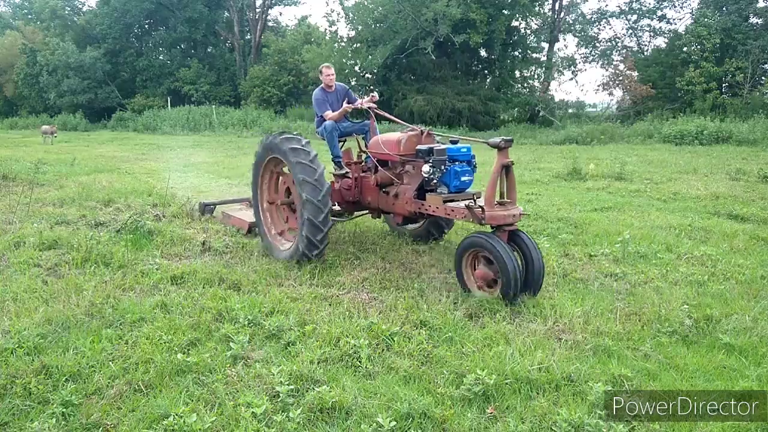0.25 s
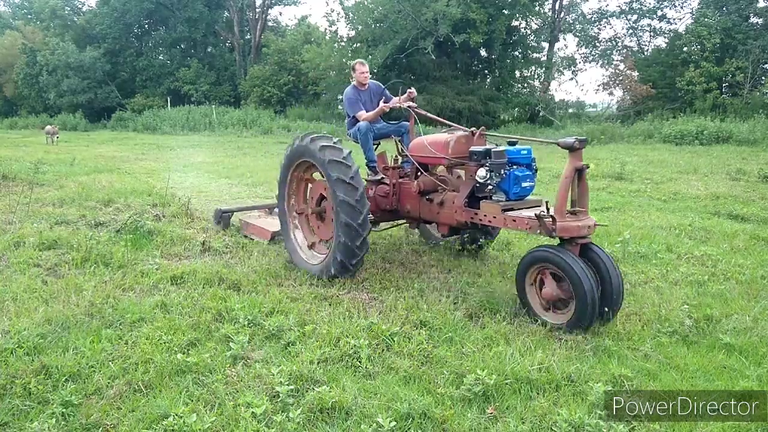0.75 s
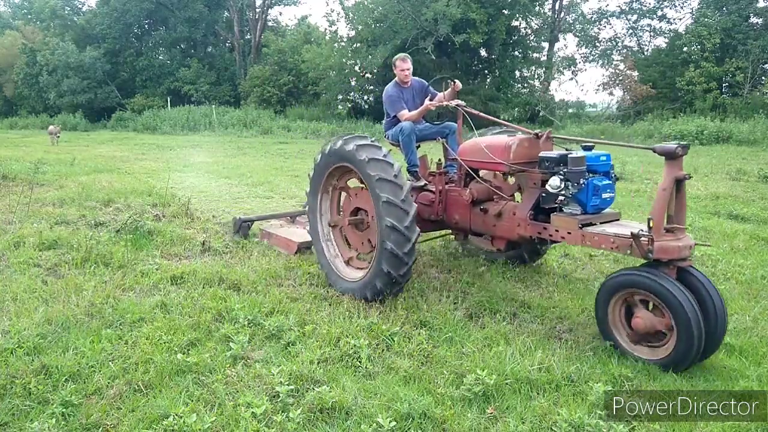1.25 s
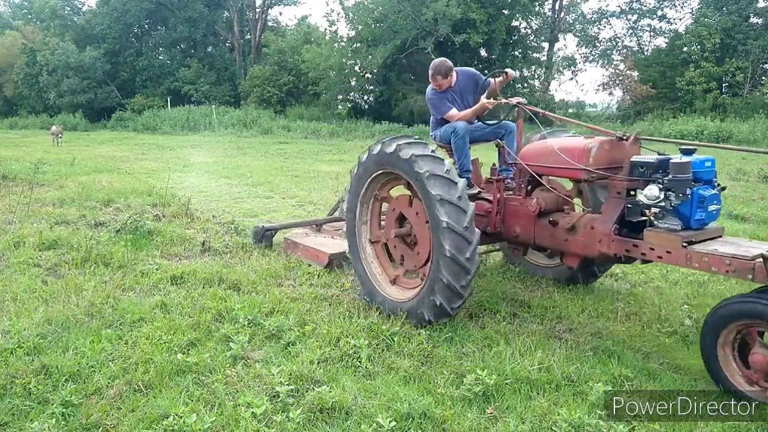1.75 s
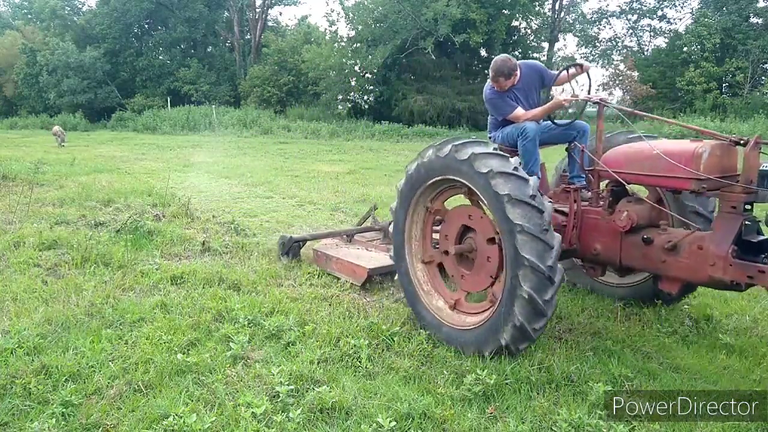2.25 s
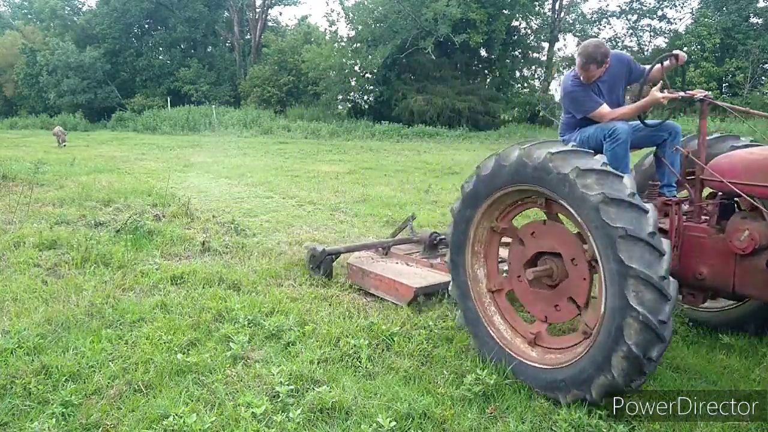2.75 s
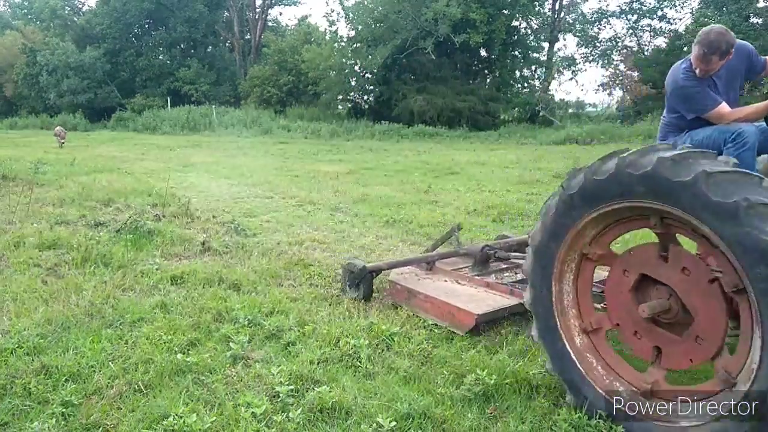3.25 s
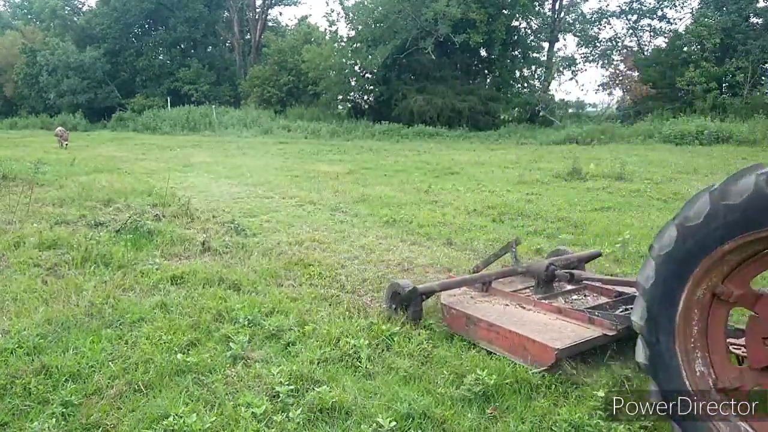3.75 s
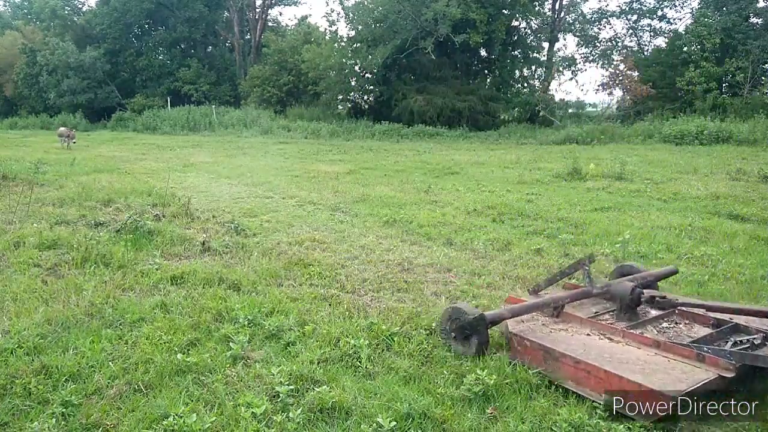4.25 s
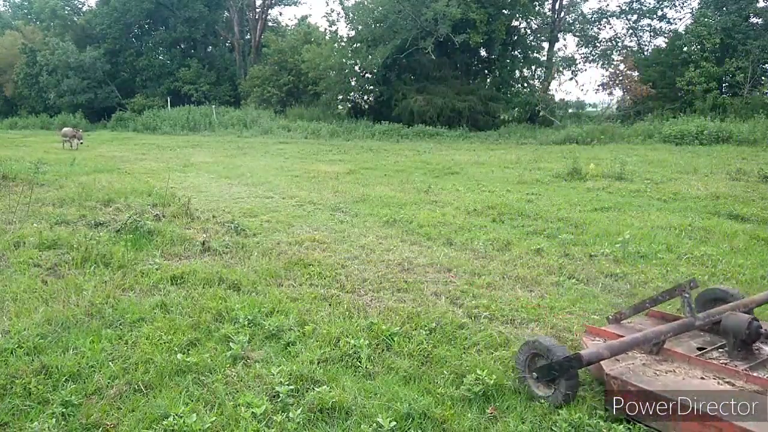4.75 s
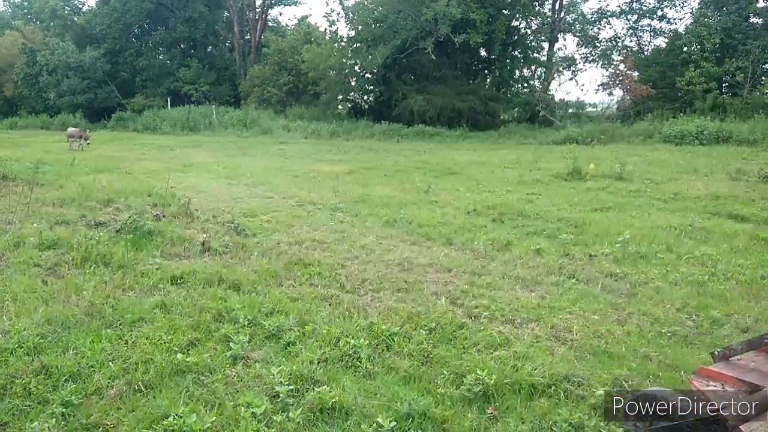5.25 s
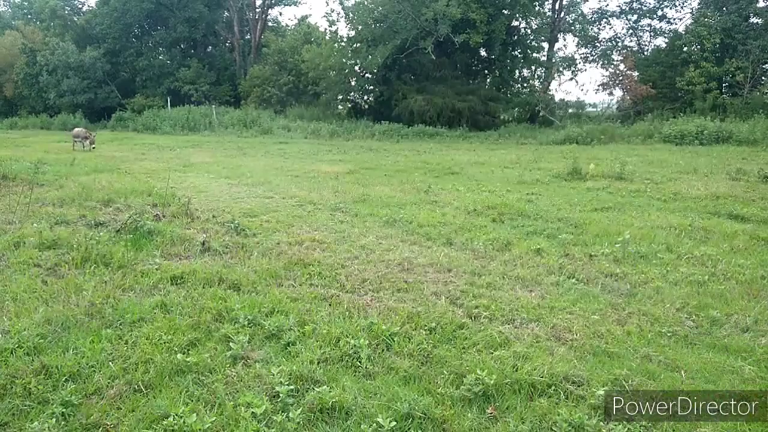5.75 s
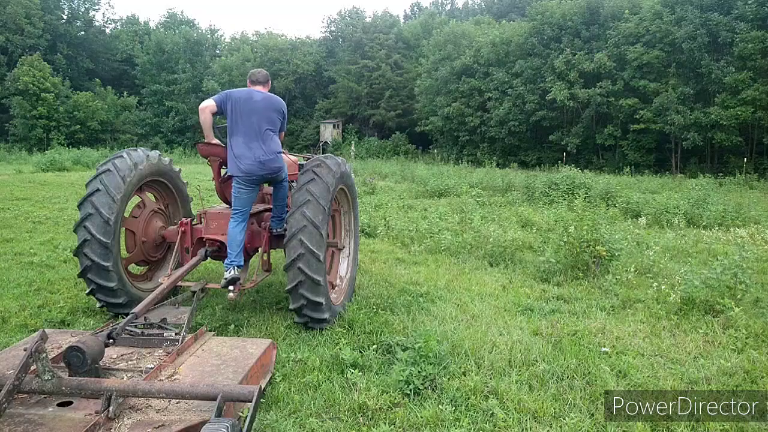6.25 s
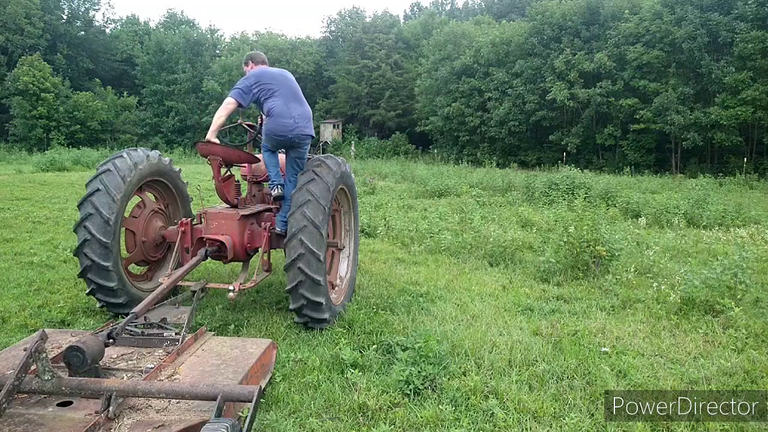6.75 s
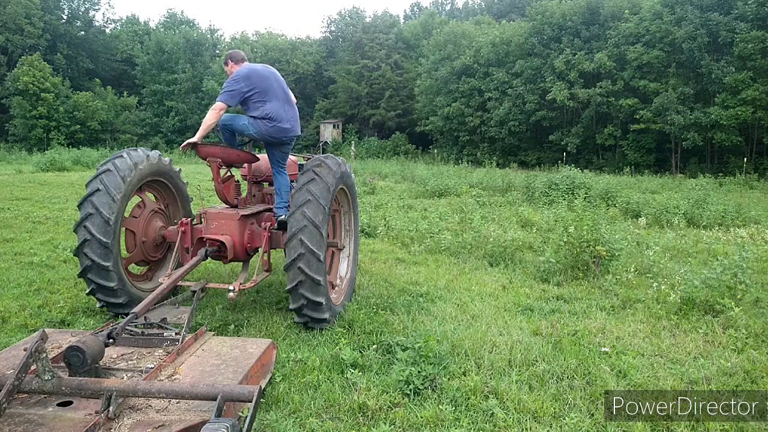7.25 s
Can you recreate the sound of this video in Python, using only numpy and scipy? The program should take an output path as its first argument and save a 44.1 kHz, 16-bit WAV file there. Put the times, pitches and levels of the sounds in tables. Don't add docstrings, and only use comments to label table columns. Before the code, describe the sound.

From 0 s a small single-cylinder gasoline engine runs loaded on a tractor towing a mower, heard close in an open field. It fires about 42 times a second, a dense, buzzing putter with a hollow exhaust note, crankcase knocking, fan whine, belt and gear rattle, and bright mechanical hiss over low roar. It is fullest from about 1.7 to 3.5 s as the tractor passes, the exhaust colour shifting and the sound leaning to the right. Short stumbles make the pitch sag and recover, notably around 0.9, 1.3, 2.2 and 3.3 s. A tiny gap comes at 4.23 s, then the level fades steadily until 6.22 s. One engine pop stutters at 6.25 s. From 6.27 s, much quieter, the engine idles at about 14 soft puffs per second with ringing sheet metal, airy noise and insects. A boot touches faintly at 6.6, scuffs at 7.08, and clinks steel at 7.16, 7.19 and 7.48 s.

```python
import sys
import numpy as np
from scipy import signal
from scipy.io import wavfile
from scipy.ndimage import uniform_filter1d, map_coordinates

SR = 44100
rng = np.random.default_rng(int(sys.argv[2]) if len(sys.argv) > 2 else 0)


def attenuation_scalar(level_db):
    decades = np.asarray(level_db, float) / 20
    return 10 ** decades


def output_pcm(signal):
    pcm = np.clip(np.atleast_2d(signal).T, -1, 1) * 32767
    wavfile.write(sys.argv[1], SR, np.round(pcm).astype(np.int16))


N = 330750

# (nose [dB], engine side [dB], rear wheel [dB], mower deck [dB], tail [dB])
SHADOW = [
    (0, .7, 1.5, 0, .5),
    (-.5, -.5, -1, 0, 0),
    (-.5, -2.5, -3, -4.5, -5),
    (-4.5, -6, -6.5, -9, -10.5),
]

IDLE_FIRST_S, IDLE_PERIOD_S = 6.2445, .071


def rms_one(x):
    return x / np.sqrt(np.mean(x ** 2) + 1e-20)


def in_time(rows):
    s, *columns = np.transpose(rows)
    return np.array([np.interp(np.arange(N) / SR, s, c) for c in columns])


def by_side(rows, stumble_db=0, hollow=0):
    sides_s = [0, 2.0, 3.4, 4.5, 5.1]
    levels = np.array([np.interp(np.arange(N) / SR, sides_s, row) for row in rows])
    return levels + np.reshape(stumble_db, (-1, 1)) * hollow


def at_hz(points, hz):
    points = np.array(points)
    return np.interp(np.log(hz), np.log(points[:, 0]), points[:, 1])


def drift(rate):
    step = 40
    r = np.exp(-2 * step * np.pi * rate / SR)
    slow = signal.lfilter([1], [1, -2 * r, r * r], rng.standard_normal(N // step + 2002))[2000:]
    return np.interp(np.arange(N) / step, np.arange(len(slow)), rms_one(slow))


def resonance(x, hz, width_hz):
    r = np.exp(-np.pi * width_hz / SR)
    zeros = np.array([1, 0, -1]) * (1 - r * r) / 2
    poles = [1, -2 * r * np.cos(2 * np.pi * hz / SR), r * r]
    return signal.lfilter(zeros, poles, x + 1e-18)


def double_resonance(x, hz, width_hz, second_width_hz):
    return resonance(resonance(x, hz, width_hz), hz, second_width_hz)


def late(x, ms):
    return np.interp(np.arange(N) - ms * SR / 1000, np.arange(N), x)


def ports(x, lag_ms, pan_db):
    return np.array([late(x, lag_ms) * attenuation_scalar(pan_db / 2), late(x, 0 * lag_ms) * attenuation_scalar(-pan_db / 2)])


def noise_bands(spectrum, low_hz, lag_ms, level_db, pan_db, patchy_db, spread=0):
    # (frequency [Hz], coherence [0-1])
    likeness = [(25, .75), (100, .95), (600, .9), (1300, .8), (2000, .97), (3300, .97), (4300, .5),
                (5400, .94), (6300, .92), (7500, .45), (12000, .4)]
    out, together = 0, drift(4.6)
    top_hz = spectrum[-1][0]
    edges = np.geomspace(low_hz, top_hz, int(3 * np.log2(top_hz / low_hz)) + 1)
    common, left, right = rng.standard_normal((3, 2, N))
    when = np.arange(N) - lag_ms * SR / 1000
    trailing = [rms_one(map_coordinates(c, [when], order=3)) for c in common]
    for k, (low, high) in enumerate(zip(edges, edges[1:])):
        hz = np.sqrt(low * high)
        lost = np.minimum(spread * (hz / 3300) ** 2, .3)
        alike = np.clip(at_hz(likeness, hz) * (1 - lost), 0, 1)
        shared = np.array([trailing[k % 2], common[k % 2]])
        separate = np.array([left[k % 2], right[k % 2]])
        pair = np.sqrt(alike) * shared + np.sqrt(1 - alike) * separate
        band = signal.sosfilt(signal.butter(2, [low, high], "band", fs=SR, output="sos"), pair)
        gain_db = at_hz(spectrum, hz) + level_db(hz) + patchy_db * (0.87 * together + drift(21.0))
        out = out + band * attenuation_scalar(gain_db + pan_db(hz) * np.array([[.5], [-.5]]))
    return out


def firings(turns, uneven_db):
    strength = attenuation_scalar(uneven_db * rng.standard_normal(400))[np.round(turns).astype(int)]
    return strength * np.exp(-((turns - np.round(turns)) / .004) ** 2)


def exhaust(turns, puff_db, hollow):
    # (time [s], four shares of the puff [ratio])
    early_returns = [(0.0, 1.07, 1.2, 1.19, 1.4), (0.4, 1.55, 1.44, 1.59, 1.8),
                     (0.8, 1.19, 0.89, 1.33, 0.88), (1.1, 0.96, 1.33, 1.31, -0.16),
                     (1.4, 0.88, 0.84, 1.25, -0.11), (1.7, 0.45, 0.7, 1.04, -0.3),
                     (2.0, -0.04, 0.57, 0.8, -0.44), (2.2, -0.08, 0.56, 0.27, -0.32),
                     (2.4, 0.05, 0.98, -0.79, -0.27), (2.6, -0.1, 0.88, -0.32, -0.62),
                     (2.85, -0.45, 0.65, 0.36, -0.86), (3.1, -0.45, 0.36, 0.44, -0.33),
                     (3.35, -0.51, 0.49, 0.07, -0.13), (3.55, -0.5, 0.84, -0.87, -0.12),
                     (3.75, 0.05, 0.43, -1.25, 0.33), (4.0, -0.26, 0.74, -0.73, -0.27),
                     (4.2, -0.48, 0.7, 0.96, -0.65), (4.45, -0.32, 0.52, 0.55, -0.54),
                     (4.65, -0.11, 0.81, -0.0, -0.47), (4.85, 0.41, 0.52, -0.74, -0.32),
                     (5.1, 0.85, 0.86, -0.76, 0.1), (5.4, 0.87, 0.95, -0.15, -0.3),
                     (5.7, 0.86, 1.01, 0.21, -0.62), (6.2, 0.79, 0.81, -0.29, 0.14)]
    # (time [s], four shares of the puff [ratio])
    late_returns = [(0.0, 0.81, 0.52, -0.31, 0.36), (0.4, 0.96, 0.36, -0.63, 0.11),
                    (0.8, 0.45, 0.27, -0.29, 0.02), (1.1, -0.03, -0.24, 0.11, -0.3),
                    (1.4, 0.09, -0.14, -0.05, -0.39), (1.7, -0.35, -0.22, 0.03, -0.38),
                    (2.0, -0.36, -0.32, -0.08, -0.25), (2.2, -0.07, -0.23, 0.07, -0.29),
                    (2.4, 0.24, 0.12, 0.09, 0.34), (2.6, -0.26, -0.24, 0.34, 0.07),
                    (2.85, -0.95, -0.8, -0.15, -0.23), (3.1, 0.08, -0.08, -0.07, -0.27),
                    (3.35, 0.13, -0.12, 0.14, -0.3), (3.55, 0.48, 0.36, 0.32, 0.06),
                    (3.75, 1.22, 1.2, 0.52, 0.41), (4.0, -0.0, 0.11, 0.2, 0.24),
                    (4.2, -0.7, -0.77, 0.12, -0.6), (4.45, -0.38, -0.52, 0.1, -0.13),
                    (4.65, -0.1, -0.4, 0.16, -0.19), (4.85, 0.56, -0.11, 0.07, 0.39),
                    (5.1, 0.89, 0.49, 0.17, 0.49), (5.4, 0.46, 0.05, 0.04, 0.09),
                    (5.7, 0.02, -0.28, -0.16, 0.16), (6.2, 0.77, 0.56, 0.13, 0.28)]
    return_ms = (2.42, 4.51, 6.79, 9.02, 10.49, 11.81, 13.56, 17.27)
    # (time [s], level [dB])
    chamber_level = [(0, -29), (.75, -37), (1.0, -41), (1.6, -56), (2.1, -50), (2.5, -36), (3.3, -31),
                     (3.55, -39.5), (3.9, -32.5), (4.3, -42), (4.6, -68), (6.2, -57)]
    # (time [s], hidden share [0-1])
    shielded = [(0, 0), (3.3, 0), (3.6, .3), (4.5, .3), (4.8, .85), (6.2, .85)]
    outlet_hz, outlet_width_hz = 319.6, 177.8
    chamber_hz, chamber_width_hz = 561.3, 24
    returns_lost = .42

    puffs = rms_one(firings(turns, uneven_db=.9))
    turbulence = .2 * rng.standard_normal(N) * (1 + .5 * np.cos(2 * np.pi * turns))
    puffs = puffs + turbulence
    pop = double_resonance(puffs, outlet_hz, outlet_width_hz, outlet_width_hz)
    pop = signal.sosfilt(signal.butter(4, 188, "high", fs=SR, output="sos"), pop)

    kept = 1 - returns_lost * np.minimum(hollow, 1)
    pipe = pop
    for share, ms in zip([*in_time(early_returns), *in_time(late_returns)], return_ms):
        far = kept if ms > return_ms[1] else 1
        pipe = pipe + share * far * late(pop, ms)
    hidden = in_time(shielded)[0]
    pipe = (1 - hidden) * pipe + hidden * attenuation_scalar(1.5) * resonance(pipe, 355, 236)
    chamber = rms_one(double_resonance(puffs, chamber_hz, chamber_width_hz, 11.0 * chamber_width_hz))
    return attenuation_scalar(puff_db) * pipe + attenuation_scalar(in_time(chamber_level)[0]) * chamber


def low_orders(turns, hollow):
    # (nose [dB], engine side [dB], rear wheel [dB], mower deck [dB], tail [dB])
    orders = [
        (-35.5, -36, -43.5, -41.5, -40),
        (-50, -52, -52, -44.5, -42.5),
        (-40.5, -56.5, -48, -48, -40.5),
        (-53, -39, -44, -47, -48.5),
        (-61, -63, -67, -66, -67),
        (-69, -73.5, -55, -55, -56.5),
    ]
    stumble_change = [-3.5, 18, 2, -5, 8, -3]
    second_db, third_db, fourth_db, whine_db, first_db, fifth_db = by_side(orders, stumble_change, hollow)
    tones = [(1, first_db), (5, fifth_db), (2, second_db), (3, third_db - 3.5), (4, fourth_db),
             (36, whine_db + 2.5 * drift(8.0))]
    return sum(np.sqrt(2) * attenuation_scalar(db) * np.sin(2 * np.pi * order * turns) for order, db in tones)


def casing(turns, away):
    # (frequency [Hz], width [Hz])
    modes = [(700, 100), (865, 285), (975, 24), (1160, 64)]
    # (nose [dB], engine side [dB], rear wheel [dB], mower deck [dB], tail [dB])
    panel_levels = [(-48, -41, -34, -35, -37), (-27, -28.5, -33, -32, -30.5), (-42.5, -62, -33.5, -47, -47),
                    (-39, -40, -39, -38, -35.5)]
    knocks = rms_one(firings(turns + 0.054, uneven_db=-2.5))
    swell = np.exp(.6 * np.cos(2 * np.pi * (turns + .05)))
    knocks = knocks + (1.5 + 1.8 * away) * rng.standard_normal(N) * swell
    panels = [double_resonance(knocks, hz, width, 0.91 * width) for hz, width in modes]
    panels = [p / np.sqrt(uniform_filter1d(p ** 2, size=SR // 2) + 1e-12) for p in panels]
    return np.sum(panels * attenuation_scalar(by_side(panel_levels) - 5.5), axis=0)


def machinery(turns, lag_ms, controls):
    # (frequency [Hz], level [dB per Hz])
    hiss = [(740, -33), (1250, -6), (1510, -7.5), (1750, -13), (1990, 1.5), (2170, -26.5), (2710, -5.5),
            (3600, -1), (5930, -7.5), (9050, -5.5), (12300, -12.5), (14900, -13.5), (15700, -14)]
    # (frequency [Hz], row [index])
    control_rows = [(1500, 0), (2200, 1), (4000, 2), (9000, 3)]
    # (frequency [Hz], row [index])
    shadow_rows = [(1000, 0), (3000, 1), (5500, 2), (8000, 3)]
    # (time [s], likeness lost at 3.3 kHz [0-1])
    deck_spread = [(0, 0), (2.2, 0), (2.8, .15), (4.7, .12), (5.2, 0), (6.2, .01)]
    shadow = by_side(SHADOW)
    controls = controls - controls[:, :5 * SR].mean(axis=1, keepdims=True)
    angle = 2 * np.pi * (turns + .13)
    pulse_db = 1.4 * np.cos(angle) + .9 * np.cos(2 * angle)

    def blend(curves, place):
        return sum(c * max(0, 1 - abs(place - k)) for k, c in enumerate(curves))

    def level_db(hz):
        return blend(controls, at_hz(control_rows, hz)) + pulse_db

    def pan_db(hz):
        return blend(shadow, at_hz(shadow_rows, hz))

    return attenuation_scalar(-16.5) * noise_bands(hiss, 1126.3, lag_ms, level_db, pan_db, patchy_db=0.79,
                                    spread=in_time(deck_spread)[0])


def roar(lag_ms):
    # (frequency [Hz], level [dB per Hz])
    spectrum = [(25, -18), (60, -13), (120, -7), (220, -7), (400, 0), (520, -4), (700, -9), (1000, -7),
                (1300, -9)]
    # (nose [dB], engine side [dB], rear wheel [dB], mower deck [dB], tail [dB])
    roar_level = [(-41, -38, -37.5, -38, -42)]
    noise = noise_bands(spectrum, spectrum[0][0], lag_ms, lambda hz: 0, lambda hz: 0, patchy_db=1.6)
    return attenuation_scalar(by_side(roar_level)[0]) * rms_one(noise)


def gearbox(rattle_db):
    # (frequency [Hz], width [Hz], level over the rattle [dB])
    gears = [(1989, 124, -3.5), (2393, 400, -4.5)]
    tones = 0
    for hz, width, db in gears:
        ring = rms_one(double_resonance(rng.standard_normal(N), hz, width, width))
        tones = tones + attenuation_scalar(db + 3.4 * drift(13.0)) * ring
    coming_into_view = np.clip(np.arange(N) / SR / 2.8, 0, 1)
    return tones * attenuation_scalar(uniform_filter1d(rattle_db, size=SR // 2)) * coming_into_view


def stumbling():
    # (start [s], length [s], speed lost [firings per s], hollowness [0-1])
    stumbles = [(.69, .05, .4, 0), (.88, .16, 3.21, 1), (1.25, .12, 3.1, 1), (1.48, .08, 1.36, 0),
                (1.74, .05, .97, 0), (2.17, .11, 1.99, .9), (2.48, .16, 2.16, .1), (2.74, .08, 1.37, 0),
                (2.93, .08, 1.37, 0), (3.12, .09, 1.52, 0), (3.33, .16, 2.81, .6), (3.68, .11, .89, .35),
                (3.95, .09, 1.73, .6), (4.16, .07, 1.38, 0), (4.42, .04, .87, 0), (4.64, .09, 1.94, .35),
                (5.31, .05, 1.1, .3), (5.52, .09, .67, 0)]
    recover_s, edge_s = .1, .03
    t, sag, hollow = np.arange(N) / SR, 0, 0
    for start, length, lost, depth in stumbles:
        falling = np.clip((t - start) / length, 0, 1)
        sag = sag + lost * falling * np.exp(-np.maximum(t - start - length, 0) / recover_s)
        inside = np.minimum(t - start, start + length + edge_s - t)
        hollow = hollow + depth * np.clip(inside / edge_s, 0, 1)
    return sag, hollow


def passing():
    # (time [s], rate [firings per s])
    speed = [(0.0, 41.46), (0.85, 42.63), (1.25, 43.61), (1.6, 42.61), (2.1, 42.76), (2.75, 42.35),
             (3.3, 43.72), (3.9, 41.97), (4.6, 42.85), (5.2, 41.7), (6.2, 41.38)]
    # (time [s], lag [ms])
    lag = [(0, 0.0012), (.4, 0.04), (.75, .082), (1.15, .088), (1.42, .118), (1.5, .178), (1.65, .19),
           (1.95, .22), (2.25, .252), (3.0, .345), (4.0, 0.435), (4.7, 0.472), (5.3, .485), (6.2, 0.455)]
    # (time [s], level [dB])
    puff_level = [(0.0, -17.5), (0.4, -18.5), (0.8, -15), (1.1, -15.5), (1.4, -14), (1.7, -12.5),
                  (2.0, -11), (2.2, -11), (2.4, -12.5), (2.6, -12.5), (2.85, -13), (3.1, -11), (3.35, -12),
                  (3.55, -12.5), (3.75, -15), (4.0, -12), (4.2, -14.5), (4.45, -11.5), (4.65, -12.5),
                  (4.85, -15.5), (5.1, -18.5), (5.4, -17), (5.7, -18.5), (6.2, -15.5)]
    # (nose [dB], engine side [dB], rear wheel [dB], mower deck [dB], tail [dB])
    clatter = [
        (-37.5, -32.5, -37, -41.5, -40),
        (-38.5, -39, -38, -39.5, -38.5),
        (-33.5, -31.5, -32.5, -31, -32.5),
        (-31, -28, -27.5, -29, -28),
    ]
    clatter_stumble = [-1.4, -2.5, -1.1, -1.3]
    sag, hollow = stumbling()
    turns = np.cumsum(in_time(speed)[0] - sag) / SR - .004
    lag_ms, low_pan = in_time(lag)[0], by_side(SHADOW)[0]
    away = lag_ms / lag_ms.max()
    clatter_db = by_side(clatter, clatter_stumble, hollow)

    voiced = exhaust(turns, in_time(puff_level)[0], hollow) + low_orders(turns, hollow)
    voiced = voiced + gearbox(clatter_db[1])
    block = ports(casing(turns, away), .8 * lag_ms, low_pan)
    wander_ms = .008 * (.2 + .8 * away) * drift(3)
    noise = machinery(turns, lag_ms + wander_ms, clatter_db)
    return ports(voiced, lag_ms, low_pan) + block + noise + roar(lag_ms)


def idle_exhaust():
    # (frequency [Hz], width [Hz], level [dB])
    pipe_modes = [(63.4, 30, -13.5), (108, 22.6, -2), (155, 97, 1.5), (209, 99, -33.5)]
    jitter_s, puff_db, uneven_db = 0.0023, -31, 1
    puffs = np.zeros(N)
    chance = rng.standard_normal((18, 2))
    fired_s = IDLE_FIRST_S + IDLE_PERIOD_S * np.arange(len(chance)) + jitter_s * chance[:, 0]
    puffs[((fired_s + .003) * SR).astype(int)] = -attenuation_scalar(puff_db + uneven_db * chance[:, 1])
    puffs = uniform_filter1d(puffs, size=SR // 300) * 1.57
    puffs = puffs + 0.42 * late(puffs, 17.0)
    pipe = 0
    for k, (hz, width, db) in enumerate(pipe_modes):
        pipe = pipe + (-1) ** k * attenuation_scalar(db) * double_resonance(puffs, hz, width, 4.1 * width) / width
    return attenuation_scalar(77.5) * pipe


def sheet_metal():
    # (frequency [Hz], width [Hz], level [dB])
    modes = [(898, 19, -52.5), (803, 74, -57), (386, 110, -60.5), (1088, 63, -62), (2297, 90, -66),
             (2013, 46, -68.5), (4230, 33, -89), (6300, 90, -81.5), (8200, 150, -83)]
    return sum(attenuation_scalar(db) * rms_one(double_resonance(rng.standard_normal(N), hz, width, width))
               for hz, width, db in modes)


def open_air(lag_ms):
    # (frequency [Hz], level [dB per Hz])
    spectrum = [(140, -46), (240, -5.5), (311, -25), (608, -4), (720, -34), (893, -5), (956, -14),
                (1160, -11), (1650, -17), (2900, -23), (3600, -47), (4680, -75.5), (7920, -120)]
    air = rms_one(noise_bands(spectrum, 220, lag_ms, lambda hz: 0, lambda hz: .5, patchy_db=.5))
    throb_db = -0.5 * np.sin(np.pi * (np.arange(N) / SR - IDLE_FIRST_S) / IDLE_PERIOD_S)
    return attenuation_scalar(-52.5 + throb_db) * air


def field(lag_ms):
    # (frequency [Hz], level [dB per Hz])
    spectrum = [(3300, 2), (4000, 0), (5000, -2.5), (6300, -3), (8000, -5), (10000, -7.5), (13000, -10),
                (15800, -14)]
    noise = noise_bands(spectrum, 3300, 9 + lag_ms, lambda hz: 0, lambda hz: -2.5, patchy_db=.4)
    return attenuation_scalar(-68.5) * rms_one(noise)


def boot_taps():
    # (time [s], peak level [dB], frequency [Hz])
    clinks = [
        (6.6059, -67, 2780),
        (7.158, -47, 2820),
        (7.1935, -48, 2890),
        (7.4769, -53.5, 2730),
    ]
    taps = np.zeros(N)
    for s, db, hz in clinks:
        tap = np.zeros(N)
        tap[round(s * SR)] = attenuation_scalar(db + 42.5)
        taps += double_resonance(tap, hz, 63.0, 410.0)
        taps += 0.82 * resonance(resonance(tap, 2.1 * hz, 90.0), 2.17 * hz, 375.0)
    return taps


def boot_scuff():
    middle_s, length_s, level_db = 7.08, .05, -59
    envelope = np.exp(-((np.arange(N) / SR - middle_s) / length_s) ** 2)
    rub = resonance(resonance(rng.standard_normal(N), 1400, 2000), 1300, 2230)
    return attenuation_scalar(level_db) * envelope * rms_one(rub)


def idling():
    lag_ms = np.full(N, -.1)
    compact = idle_exhaust() + sheet_metal() + boot_taps() + boot_scuff()
    return ports(compact, lag_ms, -0.47) + open_air(lag_ms) + field(lag_ms)


def scene():
    dropout_s, dropout_end_s = 4.225, 4.2397
    fade_end_s, silent_s = 6.2255, 6.254
    stutter_s, idle_s, stutter_from_s = 6.2497, 6.2705, 5.2
    stutter_db, stutter_edge_s = 6.5, .0015
    t, loaded = np.arange(N) / SR, passing()
    fade = np.clip((silent_s - t) / (silent_s - dropout_end_s), 0, 1)
    heard = (t < dropout_s) | ((t > dropout_end_s) & (t < fade_end_s))
    out = loaded * fade * heard + idling() * (t >= idle_s)

    start, stop = round(stutter_s * SR), round(idle_s * SR)
    cycle = resonance(loaded[1], 400, 400)[round(stutter_from_s * SR):][:SR // 40]
    source = round((stutter_from_s - .011) * SR) + cycle.argmax()
    edge = np.minimum(np.arange(stop - start) / SR / stutter_edge_s, 1)
    out[:, start:stop] = attenuation_scalar(stutter_db) * loaded[:, source:source + stop - start] * edge
    return out


def top_cut(x):
    return signal.sosfilt(signal.butter(12, 16570, fs=SR, output="sos"), x)


def record(dry):
    mix = signal.sosfilt(signal.cheby2(16, 50, 15950, fs=SR, output="sos"), dry)
    return top_cut(mix)


dry = scene()
out = record(dry)
output_pcm(out)
```